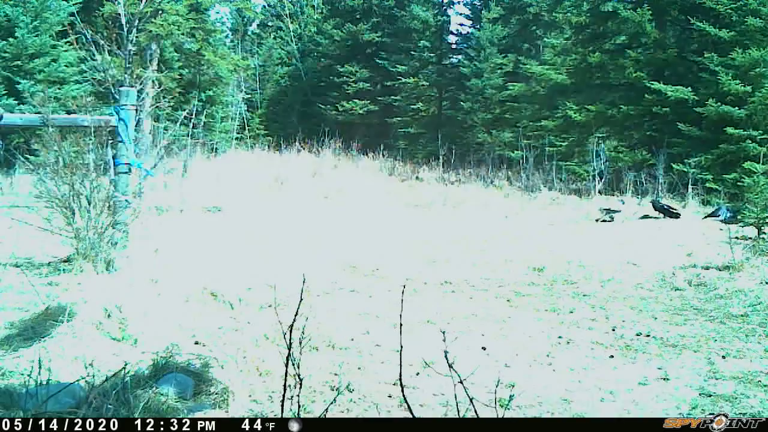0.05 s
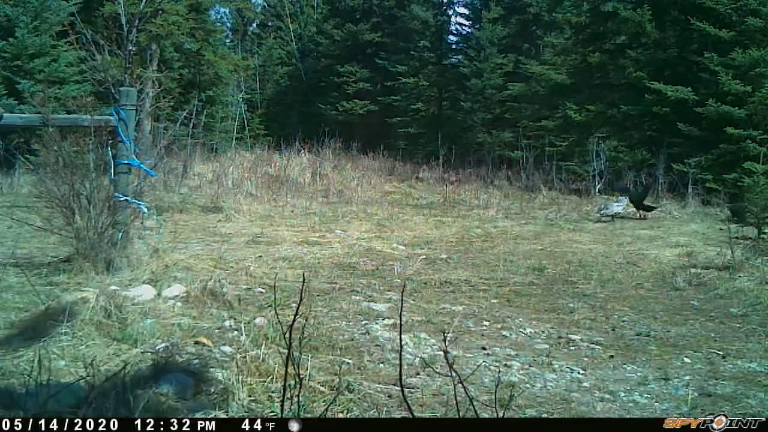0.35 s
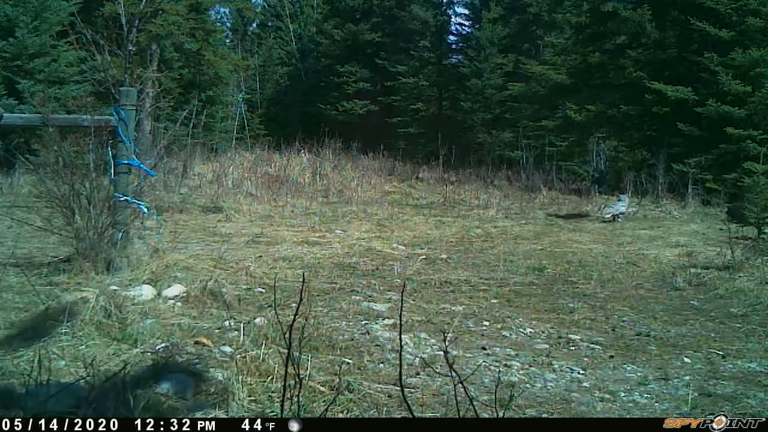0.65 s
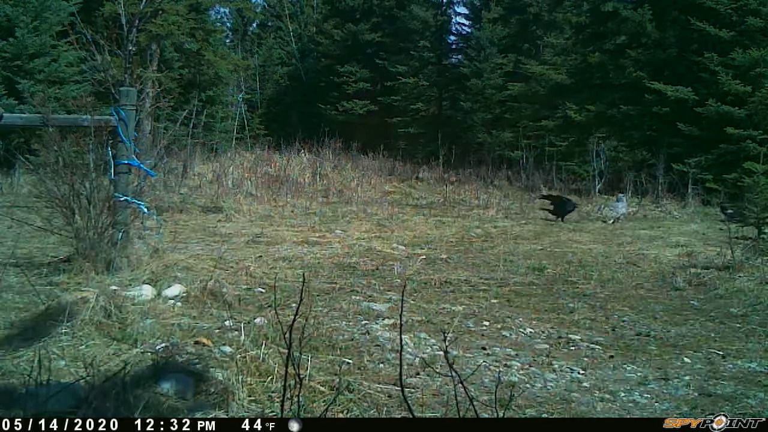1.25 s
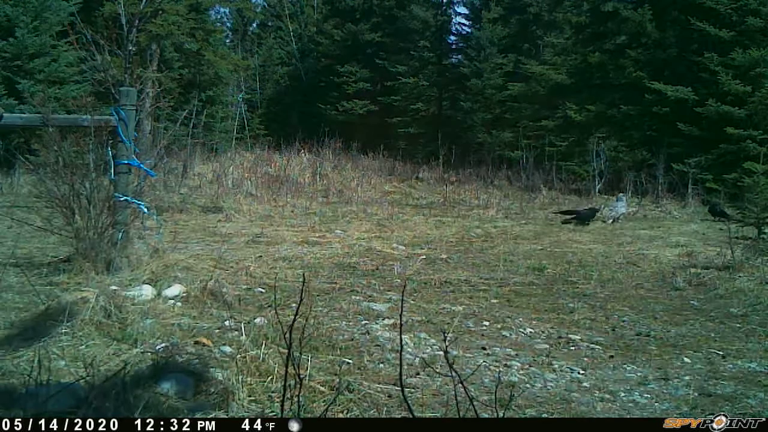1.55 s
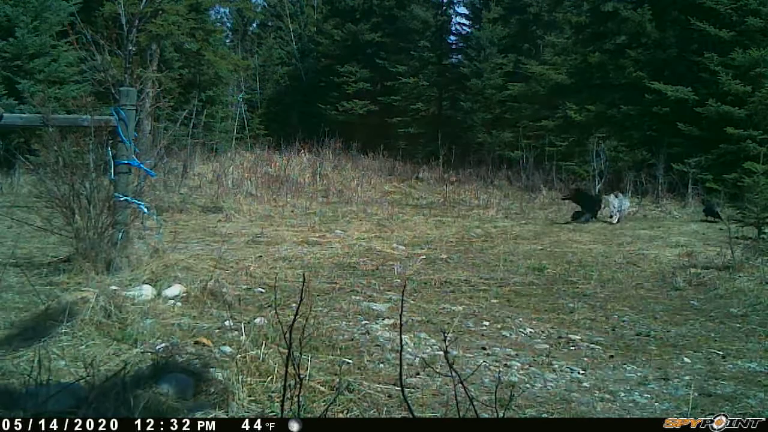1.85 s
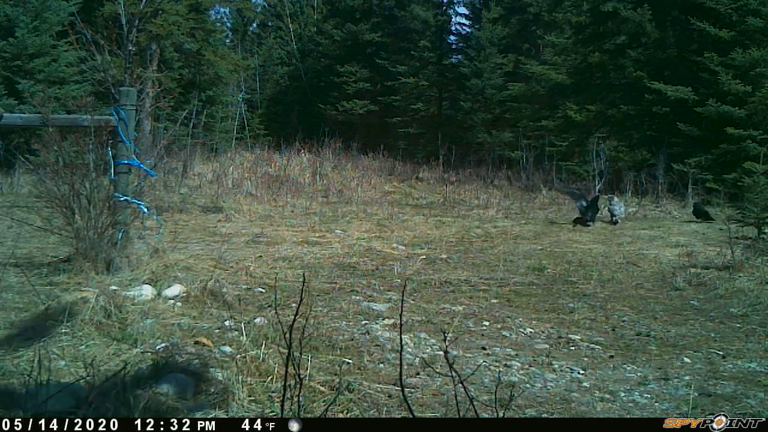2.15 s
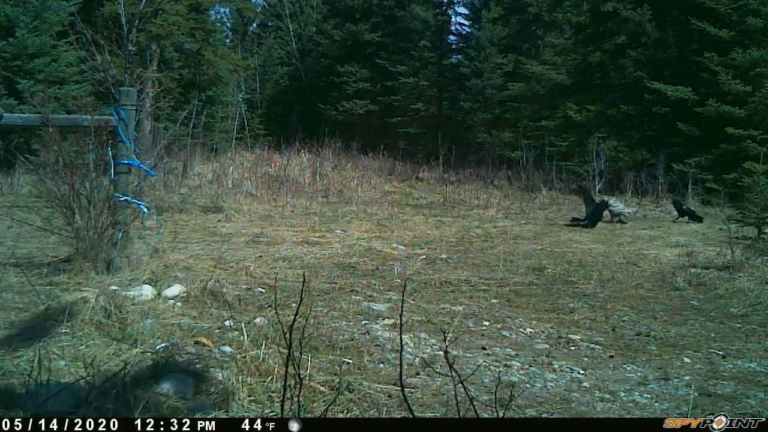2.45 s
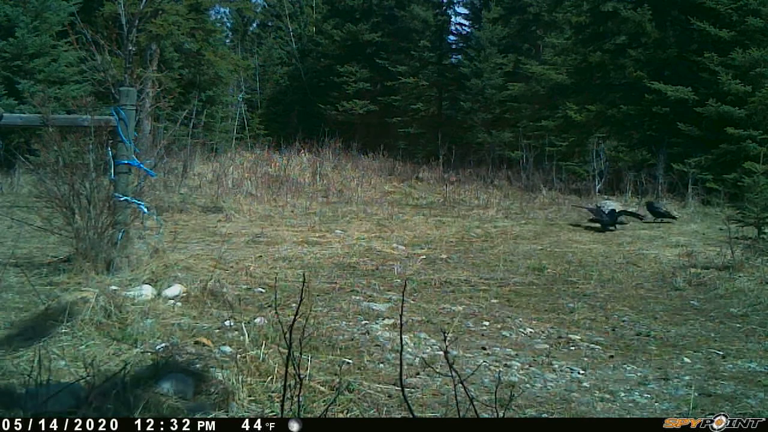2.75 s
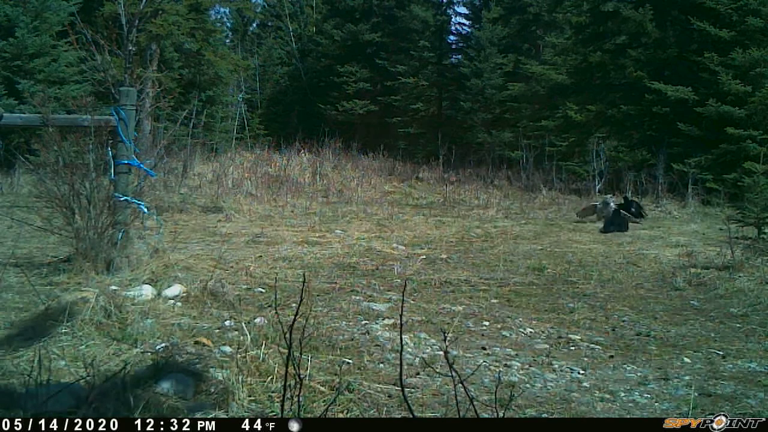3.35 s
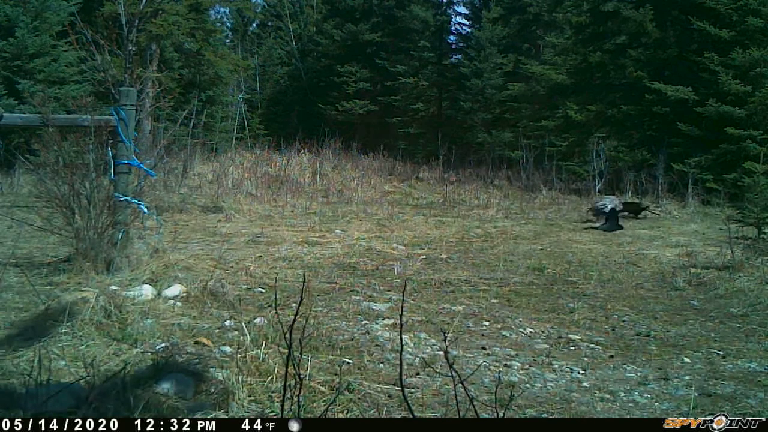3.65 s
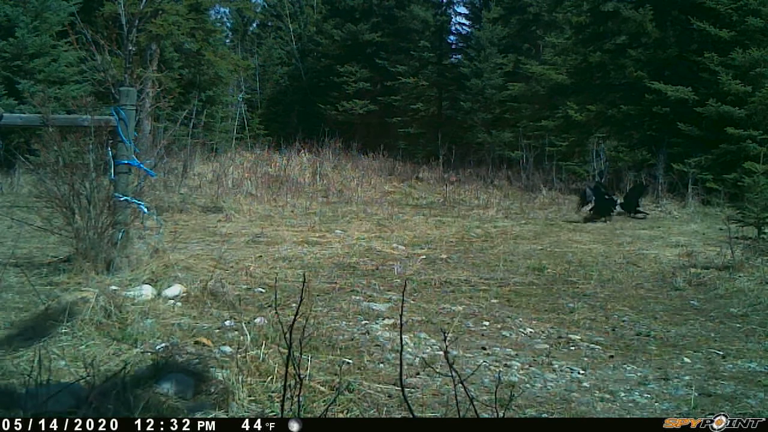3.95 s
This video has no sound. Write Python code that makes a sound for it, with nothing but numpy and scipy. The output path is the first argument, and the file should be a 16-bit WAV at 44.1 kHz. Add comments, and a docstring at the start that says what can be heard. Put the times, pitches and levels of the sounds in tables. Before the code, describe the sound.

Ravens squabble with harsh, hoarse caws across a forest clearing, over light wind.

```python
"""Light wind, hiss and a thin electronic whine: a small outdoor camera switches on in a forest clearing.
Wings thump and brush dry grass, then ravens on the far side start to squabble. Each call opens as a dry
rattle, swells into a hoarse caw and drops in pitch as it dies; the trees throw it back.
After two caws come a gust, a flurry of wingbeats and one soft coo. From about 2 s the squabble resumes
with three loud caws and ends in a run of quieter ones."""
import sys
import numpy as np
from scipy import signal
from scipy.fft import rfft, irfft
from scipy.io import wavfile
from scipy.ndimage import uniform_filter1d

SR = 44100
rng = np.random.default_rng(int(sys.argv[2]) if len(sys.argv) > 2 else 0)


def output_pcm(signal):
    """Save a mono or channel-first signal as 16-bit PCM at the path in sys.argv[1].

    Samples are clipped to [-1, 1] before scaling.
    """
    pcm = np.clip(np.atleast_2d(signal).T, -1, 1) * 32767
    wavfile.write(sys.argv[1], SR, np.round(pcm).astype(np.int16))


N = 176400


def amp(db):
    """Decibels to gain."""
    return 10 ** (np.asarray(db) / 20)


def unit(x):
    """Scales to rms 1."""
    return x / np.sqrt(np.mean(x ** 2) + 1e-20)


def curve_at(points, hz):
    """Reads a curve on a log-frequency axis."""
    f, value = np.transpose(points)
    return np.interp(np.log(hz + 1), np.log(f + 1), value)


def add(mix, start_s, sound):
    """Drops a sound into the mix."""
    part = mix[max(round(start_s * SR), 0):][:len(sound)]
    part += sound[:len(part)]


def noise(eq):
    """Noise coloured by an EQ curve, rms 1."""
    gain = amp(curve_at(eq, np.fft.rfftfreq(N, 1 / SR)))
    return unit(irfft(rfft(rng.standard_normal(N)) * gain, N))


def wander(hz):
    """Smooth random modulation up to a rate, rms 1."""
    rolloff = 1 + (np.fft.rfftfreq(N, 1 / SR) / hz) ** 4
    return unit(irfft(rfft(rng.standard_normal(N)) / rolloff, N))


# Fader ride of the gusts: t/s, level/dB
GUST_RIDE = [(.2, -53.5), (.55, -52), (.8, -52), (.84, -40.5), (.96, -46), (1.0, -45.5), (1.55, -53),
             (1.6, -46), (1.9, -52), (2.8, -51), (3.2, -50), (3.9, -54)]
# Rumble of the gusts: f/Hz, level/dB
GUST_EQ = [(8, -4.5), (25, 7.5), (60, 0.5), (150, -2), (260, -10), (600, -44.5)]
# Bed of distant wind in the trees and camera hiss: f/Hz, level/dB
AIR_EQ = [(30, -6), (150, -0.5), (215, -7), (280, 1.5), (350, -7.5), (465, -4), (600, -7.5), (1050, -15),
          (1330, -11.5), (1750, -20), (2300, -22), (2660, -20), (2950, -24.5), (6600, -28), (7150, -26),
          (8000, -31)]
# Tones of the camera's electronics: f/Hz, level/dB
WHINE_TONES = [(3672, -80), (4983, -92.5)]


def ambience():
    """Low gusts over a gently wavering bed of air and hiss, with the camera's thin whine."""
    t = np.arange(N) / SR
    gusts = noise(GUST_EQ) * amp(np.interp(t, *np.transpose(GUST_RIDE)) - 4.5)
    air = noise(AIR_EQ) * amp(-54.5 + .96 * wander(hz=4.8))
    whine = sum(np.sqrt(2) * amp(db) * np.sin(2 * np.pi * hz * t) for hz, db in WHINE_TONES)
    return gusts + air + whine


# Wing thumps: t/s, peak level/dB, half-width/s
WING_THUMPS = [(.545, -42, .0015), (.837, -37, .007), (.884, -37, .006), (.899, -42, .004),
               (.915, -41, .004), (.931, -39, .003), (.945, -36, .0025), (1.131, -37, .005),
               (1.6, -44, .009), (2.15, -39, .008), (3.463, -42, .002)]
# Brushes of dry grass: t/s, half-width/s, level/dB, centre f/Hz
GRASS_BRUSHES = [(0.546, 0.027, -68.5, 4200), (1.5, 0.085, -67, 7100), (3.316, 0.019, -68, 3900),
                 (3.409, 0.018, -62, 3700), (3.65, 0.079, -67.5, 7400)]


def wings(band_octaves=.83):
    """Wings push soft pulses of air; feathers on dry grass make short swishes of bright noise."""
    t, out = np.arange(N) / SR, np.zeros(N)
    for at, db, width in WING_THUMPS:
        spread = ((t - at) / width) ** 2
        out -= amp(db) * (1 - 2 * spread) * np.exp(-np.minimum(spread, 50))
    for at, width, db, hz in GRASS_BRUSHES:
        band_hz = hz * 2 ** (band_octaves * np.arange(-2, 3))
        swish = noise(list(zip(band_hz, (-30, -8, 0, -8, -30))))
        out += amp(db) * swish * np.exp(-np.minimum(((t - at) / width) ** 2, 50))
    return out


# Pitch envelope of a call, climbing, cresting and settling: t/s from the first beat, pitch/ratio
PITCH_ARCH = [(-.01, .9), (.025, .99), (.07, 1.045), (.11, 1.025), (.15, .995), (.24, 1.0)]
# Colour of the rasp: f/Hz, level/dB
RASP_EQ = [(200, 0), (800, 13), (1400, -3.5), (2700, -2), (7000, 4.5)]
# Colour of the forced voice's hiss: f/Hz, level/dB
HISS_EQ = [(1500, -12), (3200, 4.5), (5000, 0), (8000, -3)]
# Raven cues: first beat t/s, full voice t/s, slew end t/s, dying t/s, base level/dB, swell/dB,
# pitch f/Hz, first beat rate/Hz, beat rate at slew end/Hz, beat width at full voice/cycles,
# second partial/dB, third partial/dB, high overtones/dB, roughness/0-1, echo send/dB
CAW_CUES = [ (.625, .641, .650, .654, -38.5, 5, 470, 61, 56, .22, -4, -9, -7, .48, -6),
            (.750, .850, .845, .861, -36.5, 7.5, 428, 51.5, 42, .44, -11, -3, -20, .16, -1),
            (1.97, 2.139, 2.18, 2.160, -32.5, 6, 483.2, 64.2, 43, .4, -3, 0.5, -4.5, 0.19, 4.5),
            (2.403, 2.547, 2.42, 2.647, -30.5, 5.5, 464.3, 59.2, 43.3, 0.5, 1, 0.5, -6, 0.11, 1.5),
            (2.926, 2.962, 3.020, 3.055, -33, 5, 448, 48, 38.5, .33, 3.5, 5.5, -10, .22, -5),
            (3.128, 3.149, 3.27, 3.258, -49, -0.5, 446, 57, 69, 0.35, -4, -12, -7, 0.5, -4),
            (3.273, 3.297, 3, 3.325, -40.5, 4, 480.6, 61, 60, 0.26, -2, -5, -9.5, 0.49, 2),
            (3.358, 3.412, 3.435, 3.445, -37.5, 7, 445, 57, 38, .27, 0, 2, -9, .45, -2),
            (3.660, 3.681, 3.681, 3.690, -40, 3, 470, 45, 44, .22, -1, 3.5, -10, .42, -8),
            (3.704, 3.705, 4, 3.722, -47.5, 0.5, 451, 63, 67, 0.23, -8, 9, -9, 0.5, -3)]


def caw(first, full, slew_end, dying, db, swell_db, pitch_hz, first_rate, later_rate, full_width,
        second_db, third_db, overtones_db, rough):
    """A buzz chopped into beats that swell with effort and merge as it dies; gives start, voice, hiss."""
    attack_s, release_db_per_s, merge_s = .009, 342.5, .025
    sag_hz_per_s, sag_lag_s, sag_knee_s = 3900, .003, .011
    end = dying + .014 + .19 * (dying - first)  # longer calls take longer to die
    t = np.arange(first - attack_s, end, 1 / SR)
    n = len(t)
    effort = np.interp(t, [first, full], [0, 1])
    dying_for = np.maximum(t - dying, 0)
    break_off = (1 + np.tanh((t - dying) / .039)) / 2

    beat_rate = np.interp(t, [first, slew_end], [first_rate, later_rate])
    beats = np.cumsum(beat_rate) / SR - attack_s * first_rate
    stumble = .067 * rough * wander(hz=40.8)[:n]
    beat_pos = (beats + stumble + .5) % 1 - .5  # cycles from the beat's centre
    width = .21 + (full_width - .21) * effort ** 2
    skewed = beat_pos * (1 - .13 * np.sign(beat_pos))  # opens faster than it shuts
    opening = uniform_filter1d(np.exp(-abs(skewed / width) ** 3), size=80)
    gate = 1 - .83 * (1 - opening) * np.exp(-dying_for / merge_s)

    sag = sag_hz_per_s * sag_knee_s * np.logaddexp(0, (t - dying - sag_lag_s) / sag_knee_s)
    hz = pitch_hz * np.interp(t - first, *np.transpose(PITCH_ARCH)) - sag
    bend_depth = np.interp(effort, [0, 1], [.1183, .0896])
    bend = bend_depth * (np.cos(np.pi * (beat_pos - .15)) ** 2 - .6)  # pitch crests late in each beat
    bend += .26 * rough ** 2 * np.sin(2 * np.pi * beat_pos)  # rough beats slide upward
    jitter = (.016 + .06 * rough) * wander(hz=238)[:n]
    phase = 2 * np.pi * np.cumsum(hz * (1 + bend + jitter)) / SR

    # Effort fills out the body; as the call breaks off, the fundamental thins and the top flares.
    fundamental = amp(-2.5 * break_off ** 2) * np.cos(phase)
    body = amp(second_db) * np.cos(2 * phase) + amp(third_db) * np.cos(3 * phase)
    body *= amp(-3 * (1 - effort))
    top = amp(overtones_db + 10 * break_off) * sum(np.cos(k * phase) for k in range(4, 10))
    buzz = fundamental + gate ** .3 * (body + top)  # overtones pulse harder
    puffs = 1 + .96 * np.cos(phase)
    rasp = 6 * rough * noise(RASP_EQ)[:n] * puffs
    voice = rasp - np.sqrt(2 * (1 - rough ** 2)) * buzz
    hiss = amp(-27.5 + 4 * break_off) * noise(HISS_EQ)[:n] * puffs

    level = amp(db - swell_db * (1.5 - effort) - release_db_per_s * dying_for)
    level *= amp(2 * rough * wander(hz=45)[:n])  # rough beats are uneven in strength
    level *= gate * np.clip(np.minimum(t - t[0], t[-1] - t) / attack_s, 0, 1)
    return t[0], voice * level, hiss * level


# Formants of throat and beak: f/Hz, level/dB
THROAT_EQ = [(120, -26), (280, 2), (400, -1), (475, 2), (570, -5.5), (720, -10.5), (940, -8.5), (1150, -9),
             (1390, -6.5), (1520, -12), (1750, -27), (2300, -32.5), (2690, -10.5), (3000, -44),
             (4500, -39.5), (8000, -43)]


def throat(voice, size=4096):
    """Throat and beak resonate, shaping the voice as a causal filter."""
    log_gain = np.log(amp(curve_at(THROAT_EQ, abs(np.fft.fftfreq(size, 1 / SR)))))
    taps = np.fft.ifft(np.exp(signal.hilbert(log_gain).conj())).real[:size // 2]
    return signal.oaconvolve(voice, taps)[:N]


# Colour of the forest's echo: f/Hz, level/dB
ECHO_EQ = [(250, -11), (470, -32.5), (950, -20), (1380, -12), (2700, -8), (6000, -27)]
# Length of its tail: f/Hz, T60/s
ECHO_DECAY = [(300, 0.26), (1400, 0.71), (5000, 0.14)]


def forest_echo(send, build_s=.009):
    """The trees scatter the calls into a diffuse tail that lingers longest in the mids."""
    hz, t, scatter = signal.stft(unit(rng.standard_normal(SR)), SR, nperseg=256)
    tail = amp(-60 * t / curve_at(ECHO_DECAY, hz)[:, None]) * (1 - np.exp(-t / build_s))
    tail /= np.sqrt(SR * np.mean(tail ** 2, 1, keepdims=True))  # equal energy in each band
    tail *= amp(curve_at(ECHO_EQ, hz))[:, None]
    impulse = signal.istft(scatter * tail, SR, nperseg=256)[1]
    return signal.fftconvolve(send, impulse)[:N]


# Coo cue: t/s, length/s, level/dB, low f/Hz, top f/Hz, overtone/dB
COO_CUE = (1.176, .105, -47, 260, 405, -13)


def coo(start, length, db, low_hz, top_hz, overtone_db):
    """One soft, clean note whose pitch and level arch up and down; gives start, sound."""
    arch = np.sin(np.linspace(0, np.pi, round(length * SR))).clip(0)
    phase = 2 * np.pi * np.cumsum(low_hz + (top_hz - low_hz) * arch ** 1.59) / SR
    tone = np.sin(phase) + amp(overtone_db) * arch ** 2 * np.sin(2 * phase)
    return start, amp(db) * np.sqrt(2 * arch) * tone


def scene():
    """Mono mix: caws with their echo send, the dry coo, wings and ambience."""
    voices, hisses, echo_send = np.zeros((3, N))
    for *cue, send_db in CAW_CUES:
        start, voice, hiss = caw(*cue)
        add(voices, start, voice)
        add(hisses, start, hiss)
        add(echo_send, start, amp(send_db) * voice)
    direct = throat(voices) + hisses
    add(direct, *coo(*COO_CUE))
    return (direct + forest_echo(throat(echo_send)) + wings() + ambience())[None]


def record(dry):
    """The camera switches on, cuts the high treble and adds a steady DC offset."""
    switch_on_s, cutoff_hz, dc_offset = .072, 8250, -.0156
    on = np.arange(N) / SR > switch_on_s
    lowpass = signal.firwin(121, cutoff_hz, window=("kaiser", 8), fs=SR)
    return dc_offset + signal.oaconvolve(dry * on, lowpass[None], "same")


dry = scene()
out = record(dry)
output_pcm(out)
```